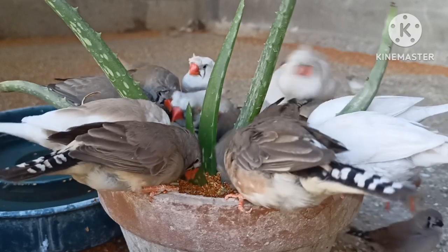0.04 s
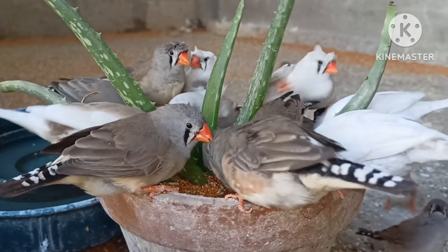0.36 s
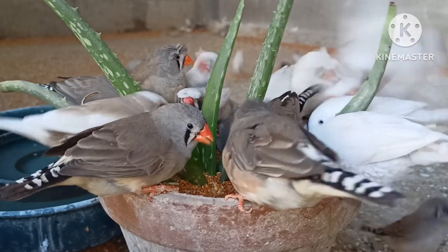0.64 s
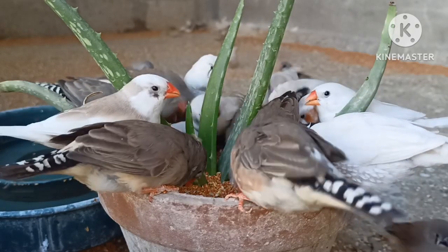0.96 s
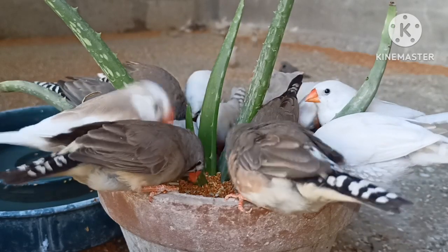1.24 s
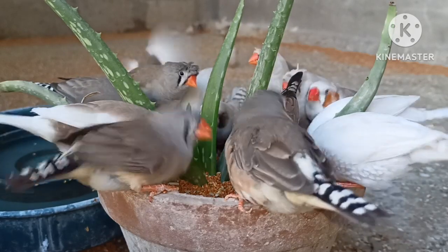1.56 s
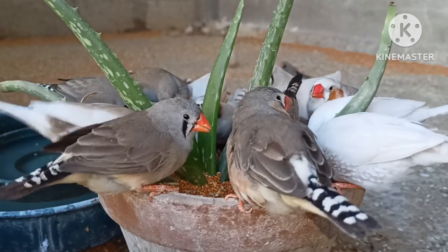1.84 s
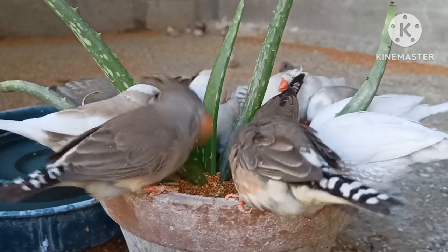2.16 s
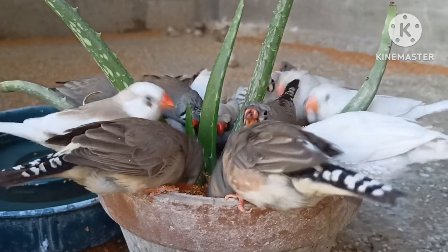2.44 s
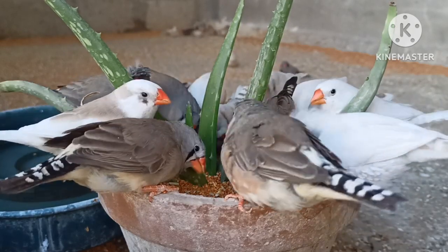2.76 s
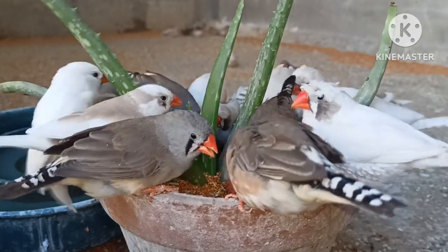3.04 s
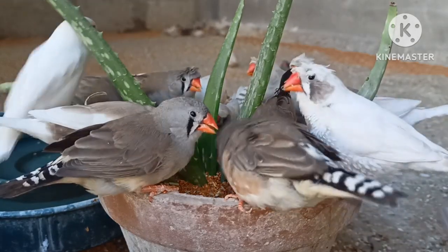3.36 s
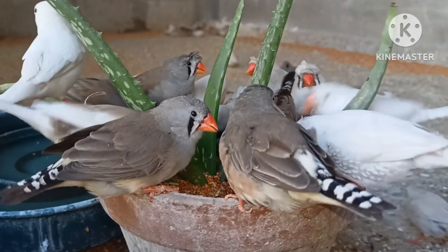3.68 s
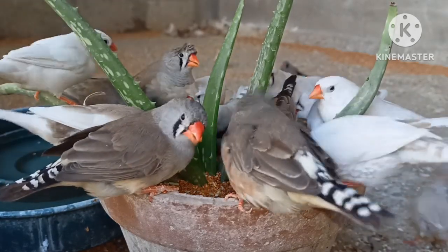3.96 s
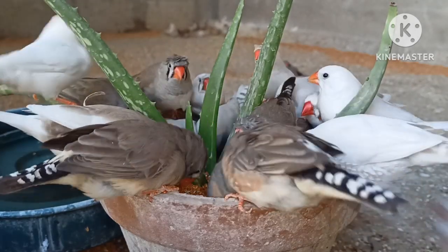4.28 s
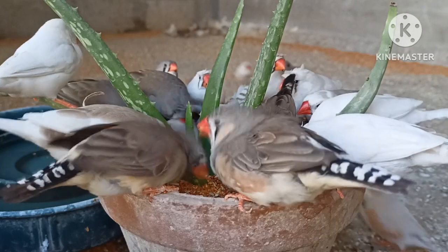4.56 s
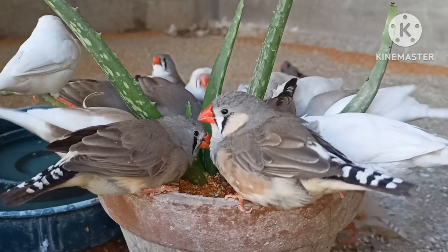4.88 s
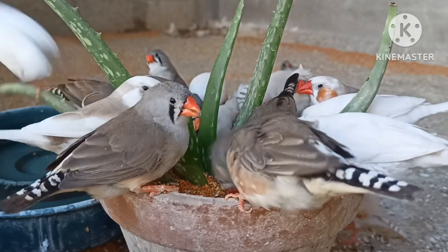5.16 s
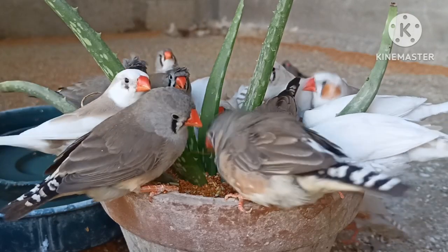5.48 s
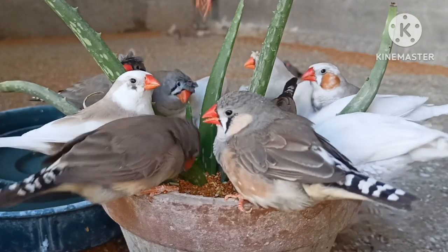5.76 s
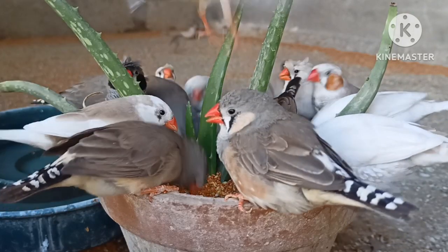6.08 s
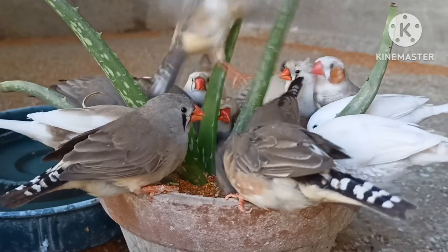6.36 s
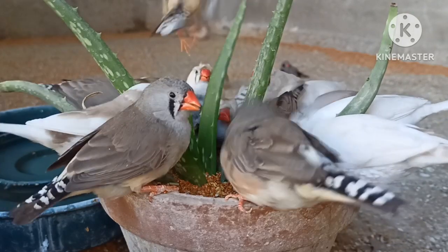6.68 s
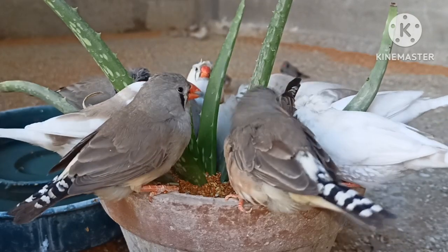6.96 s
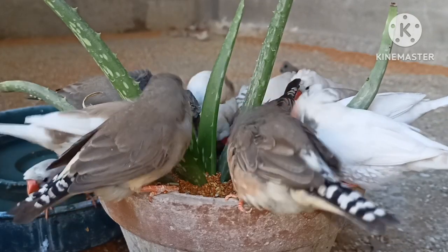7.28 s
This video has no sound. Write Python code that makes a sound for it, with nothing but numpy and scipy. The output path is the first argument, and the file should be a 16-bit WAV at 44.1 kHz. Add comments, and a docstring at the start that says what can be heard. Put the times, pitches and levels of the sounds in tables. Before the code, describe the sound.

Several finch fledglings beg with hoarse, rising calls while adults chip, wings flutter twice and beaks tick on seed over a low rumble.

```python
"""A brief nasal note, then the rasping, rising calls of finch fledglings begging, several at once.
The flock crowds round a pot of seed in a hard-walled aviary. The young whine between bouts; adults put
in short chips, level nasal calls and one squeak. The calls follow the source-filter principle: the
syrinx supplies harmonics and breath noise, and the throat and beak shape them. Wings whirr as birds
come and go, beaks tick on husks, and a low rumble lies under it all."""
import sys
import numpy as np
from scipy import signal
from scipy.fft import rfft, irfft, next_fast_len
from scipy.io import wavfile

SR = 44100
rng = np.random.default_rng(int(sys.argv[2]) if len(sys.argv) > 2 else 0)


def wav_record(signal):
    """Record a signal, one row per channel, as 16-bit PCM in the file named by sys.argv[1]."""
    frames = np.transpose(np.atleast_2d(signal))
    bounded = np.clip(frames, -1, 1)
    # unit amplitude maps onto the largest positive 16-bit level
    quanta = np.round(bounded * 32767).astype(np.int16)
    wavfile.write(sys.argv[1], SR, quanta)


N = 322812
TIME = np.arange(N) / SR
CUTOFF_HZ = 15750

# Spectra of the noise sources. Each row: frequency in Hz, relative spectral density in dB.
RUMBLE_SPECTRUM = [(30, -58), (60, -13.5), (100, -3.5), (145, 1.5), (210, -6), (290, -4), (450, -13),
                   (800, -18), (1600, -24.5), (2400, -31.5), (4500, -29), (9000, -37), (15000, -34)]
DRAUGHT_SPECTRUM = [(20, -32.5), (55, 1), (90, 7.5), (160, -1.5), (400, -36), (1500, -76)]
TICK_SPECTRUM = [(500, -29), (2500, -4), (6000, -7), (10000, -9), (15000, -3.5)]
PUFF_SPECTRUM = [(30, -24), (90, -2.5), (280, 4.5), (600, -6.5), (1500, -21.5), (5000, -57)]
SWISH_SPECTRUM = [(300, -12), (1500, 4.5), (4500, 5.5), (8000, 10), (11000, -2), (15000, 13)]
# Partials of a faint hum. Each row: frequency in Hz, level in dB.
HUM_PARTIALS = [(143, -52.5), (286, -57)]
# Air stirred by wings, and one close gust. Each row: time in seconds, relative level in dB.
DRAUGHT_LEVELS = [(0.0, -45), (0.08, -44), (0.16, -64), (0.37, -49.5), (0.55, -48), (0.73, -45),
                  (0.98, -42.5), (1.14, -66), (1.22, -56), (1.34, -62.5), (1.61, -49), (1.77, -68.5),
                  (1.87, -68), (2.0, -70), (2.2, -49), (2.26, -56), (3.36, -57), (3.53, -42), (3.67, -61.5),
                  (3.91, -69.5), (4.01, -57), (4.24, -71), (4.47, -60), (4.5, -56), (4.54, -29),
                  (4.56, -51), (4.63, -48), (4.83, -35.5), (5.18, -52), (5.34, -54), (5.46, -40),
                  (5.53, -59), (6.08, -36.5), (6.16, -46), (6.36, -41.5), (6.42, -46), (6.67, -50),
                  (6.83, -42), (6.89, -40), (7.32, -60)]
GUST_LEVELS = [(4.505, -64), (4.53, -27.5), (4.55, -30), (4.575, -59), (4.6, -76)]
# Impacts of beaks and claws. Each row: start in seconds, relative level in dB.
BEAK_TICKS = [(0.6115, -39), (1.1204, -41.5), (1.6741, -44.5), (1.8831, -46), (2.0448, -44), (2.0921, -56),
              (2.1375, -42), (2.2413, -43.5), (2.2932, -40.5), (2.4428, -33.5), (3.4531, -37),
              (4.1295, -41), (5.3984, -23.5), (5.5902, -37), (5.9304, -35.5), (6.3006, -30),
              (6.4612, -38.5), (6.8428, -39), (6.9745, -40)]
# Downstrokes. Each row: time in seconds, relative levels of air puff and feather swish in dB.
DOWNSTROKES = [(0.664, -37, -39), (0.704, -34, -37), (0.742, -29, -36.5), (0.782, -34.5, -36.5),
               (0.835, -29.5, -37), (0.871, -35, -37), (0.909, -29, -39.5), (6.258, -31.5, -41),
               (6.294, -28.5, -47.5), (6.328, -39, -44), (6.364, -29.5, -43.5), (6.401, -39, -45.5),
               (6.473, -32.5, -43.5), (6.552, -36, -45.5), (6.584, -35.5, -44), (6.622, -43, -48),
               (6.655, -42, -47.5), (6.69, -39, -46), (6.725, -31, -50)]
# Course of the squeak. Each row: time in seconds, pitch in Hz, relative level in dB.
SQUEAK_CONTOUR = [(2.503, 3600, -56), (2.514, 4700, -24), (2.524, 5750, -30), (2.537, 5500, -24.5),
                  (2.553, 5850, -32), (2.566, 5400, -31), (2.58, 5200, -47)]

# Throat filters, one for each kind of voice. Each row: frequency in Hz, relative gain in dB.
CHIP_FILTER = [(450, -8), (950, 1), (1700, 3.5), (2500, 0.5), (3800, 11), (4700, 6.5), (5700, 5.5),
               (8000, 6.5), (9800, -5), (12000, -1), (15000, -3)]
NASAL_FILTER = [(600, -8), (1250, -5.5), (1850, -6.5), (2450, -0.5), (3050, 4), (3700, 0.5), (4400, 3),
                (5600, -4.5), (7000, -6.5), (9000, -13), (14000, -18)]
WHINE_FILTER = [(500, -8), (1100, -13), (1650, -2), (2200, -22), (3000, -6.5), (3700, 2), (5400, 0.5),
                (6300, -11), (7800, -7.5), (9500, -29), (14000, -20)]
HOARSE_FILTER = [(500, -20), (850, -13.5), (1100, -9.5), (1300, -9.5), (1680, -1), (2200, -11),
                 (3100, -3.5), (3900, 1), (5100, 4.5), (6300, -2.5), (7600, -1), (8800, -15.5),
                 (10600, -22), (13600, -12.5)]
DEEP_FILTER = [(500, -17), (930, -3), (1250, -12), (1550, -7), (2300, -14), (3100, -1.5), (4000, 4.5),
               (5000, 2.5), (6300, -6), (7600, -4.5), (8800, -20), (11000, -17), (14000, -21)]
# Level nasal calls. Each row: start and length in seconds, nominal pitch in Hz, level in dB,
# loudest point as a fraction of the length, mid-call beak resonance in Hz.
NASAL_CALLS = [(-.05, 0.0823, 622, -32, 1, 4100), (1.529, .14, 631, -37, 0.43, 3480),
               (7.196, 0.075, 600.6, -38, .3, 4540)]
# Falling or arched chips, and soft whines. Each row: start and length in seconds, first, middle and
# last pitch in Hz, level in dB, loudest point as a fraction, mid-call beak resonance in Hz.
CHIP_CALLS = [(2.454, 0.065, 535, 494.2, 426, -29, 0.75, 6900),
              (3.077, .085, 520, 439, 369, -35, 0.46, 3420),
              (3.777, 0.0346, 515, 569, 550, -29.5, 0.3, 5670),
              (4.483, .052, 521, 483, 436, -29, 0.78, 5800), (4.972, .072, 760, 868, 750, -32, 0.66, 2300),
              (5.362, 0.053, 575, 475, 425, -27, 0.44, 6350),
              (7.018, 0.06, 514, 483, 429, -30.5, 0.58, 5800)]
WHINE_CALLS = [(1.912, 0.15, 461, 536.5, 538, -40, 0.42, 3800),
               (2.024, 0.083, 551, 599.7, 615, -40, 0.84, 3950),
               (2.157, .16, 471.4, 542.6, 549, -38.5, 0.39, 5000),
               (6.472, 0.136, 580, 593.3, 600, -57, .4, 3820),
               (6.785, .16, 450, 528.4, 504, -37, 0.33, 4960)]
# Begging calls. Each row: start and length in seconds, nominal first and last pitch in Hz,
# level in dB, loudest point as a fraction, mid-call beak resonance in Hz.
BEGGING_CALLS = [(0.094, 0.15, 461.7, 511.5, -29.5, 0.85, 6400), (0.113, 0.16, 743, 762, -29.5, 0.46, 6400),
                 (0.257, 0.12, 575, 675, -29, 0.7, 5040), (0.309, 0.19, 458.4, 495, -29.5, 0.5, 6300),
                 (0.451, 0.12, 637, 675, -30, 0.55, 6400), (0.605, 0.14, 648, 687, -36, 0.67, 7100),
                 (0.611, 0.17, 732, 771, -33, 0.4, 6300), (0.761, 0.28, 712.4, 784.5, -31, 0.41, 7000),
                 (0.838, 0.18, 458, 509, -33, 0.1, 3920), (0.9, 0.19, 629, 676, -32, 0.97, 7900),
                 (1.014, 0.18, 475.5, 516.1, -29, 0.65, 6660), (1.018, 0.24, 716.5, 801, -35, 0, 4000),
                 (1.15, 0.154, 599, 706, -32.5, 0.4, 6690), (1.23, 0.17, 460, 476, -30.5, 0.46, 7100),
                 (1.255, 0.21, 680, 766, -34.5, 0.83, 7600), (1.434, 0.1617, 696, 744, -32.5, 0.56, 6900),
                 (1.468, 0.13, 461.4, 479.6, -32, 0.72, 4880), (2.392, 0.1, 454, 566, -36.5, 0.67, 5730),
                 (2.612, 0.178, 644, 745, -33, 0.64, 5700), (2.642, 0.155, 537, 590, -35, 0.66, 7400),
                 (2.793, 0.16, 588, 684, -32.5, 0.58, 6790), (2.811, 0.15, 697, 805, -31, 0.39, 6700),
                 (2.925, 0.17, 563, 662.7, -31, 1, 7350), (2.99, 0.093, 704, 756, -34, 0.9, 6800),
                 (3.107, 0.149, 694, 772, -31, 1, 6900), (3.181, 0.2, 566, 649, -30.5, 0.57, 7000),
                 (3.238, 0.2, 703, 785, -32.5, 0.85, 6800), (3.442, 0.18, 552, 644, -30, 0.72, 6790),
                 (3.461, 0.18, 664, 769.4, -32, 0.57, 6500), (3.578, 0.28, 547, 687, -31, 0.61, 6900),
                 (3.627, 0.2, 697, 820, -31, 0.31, 4890), (3.847, 0.21, 557.4, 653, -28, 0.72, 6910),
                 (3.868, 0.21, 710, 800, -32.5, 0.3, 5350), (4.074, 0.21, 559, 626, -28.5, 0.4, 6900),
                 (4.077, 0.2, 692, 798, -28.5, 0.35, 5760), (4.287, 0.204, 550, 692.6, -27.5, 0.69, 6930),
                 (4.285, 0.23, 700, 796, -30, 0.26, 5500), (4.521, 0.2, 565.4, 664.2, -29.5, 0.7, 7040),
                 (4.501, 0.21, 690, 769, -30.5, 0.3, 5800), (4.747, 0.28, 550, 667, -29.5, 0.7, 7110),
                 (4.753, 0.21, 711, 771.2, -30, 0.39, 5900), (4.976, 0.24, 552, 608, -32, 0.59, 5800),
                 (4.995, 0.25, 700, 738, -33.5, 0.3, 7330), (5.127, 0.15, 538, 580, -29.5, 0.5, 5950),
                 (5.133, 0.1517, 707, 798, -30, 0.7, 6880), (5.319, 0.22, 572.5, 688.5, -28, 0.23, 6300),
                 (5.417, 0.18, 668, 735, -30.5, 0.54, 6700), (5.638, 0.15, 537.6, 578, -32, 0.29, 7030),
                 (5.65, 0.25, 650, 773, -30.5, 0.35, 5600), (5.811, 0.1633, 549, 607, -29, 0.6, 6550),
                 (5.796, 0.17, 739, 810, -30.5, 0.33, 6390), (5.972, 0.14, 543, 583, -28.5, 0.36, 6300),
                 (5.991, 0.27, 676, 785, -31.5, 0.77, 8000)]


def from_db(db):
    """Amplitude grows tenfold for every 20 dB."""
    return 10 ** (np.asarray(db) / 20)


def unit_power(x):
    """Division by the RMS value gives a signal unit power."""
    return x / np.sqrt(np.mean(x ** 2) + 1e-20)


def level_at(spectrum, hz):
    """A spectrum's level in dB, interpolated on a logarithmic frequency axis."""
    known_hz, db = np.transpose(spectrum)
    return np.interp(np.log(hz), np.log(known_hz), db)


def contours(rows):
    """Linear interpolation in time gives each column a value at every sample."""
    times, *columns = np.transpose(rows)
    return [np.interp(TIME, times, column) for column in columns]


def noise(spectrum, size):
    """Spectral shaping turns white noise into coloured noise of unit power."""
    padded = next_fast_len(size)
    hz = np.fft.rfftfreq(padded, 1 / SR) + 1
    shaped = rfft(rng.standard_normal(padded)) * from_db(level_at(spectrum, hz))
    return unit_power(irfft(shaped, padded)[:size])


def waver(rate_hz, size):
    """Low-pass filtered noise gives a smooth random fluctuation of unit power."""
    pole, settling = np.exp(-2 * np.pi * rate_hz / SR), 2000
    smooth = signal.lfilter([1], [1, -2 * pole, pole * pole], rng.standard_normal(size + settling))
    return unit_power(smooth[settling:])


def add(track, start, sound):
    """Superposition: a sound adds to the track from its start in seconds."""
    at = round(start * SR)
    sound, at = sound[max(-at, 0):], max(at, 0)
    track[at:at + len(sound)] += sound[:max(N - at, 0)]


def burst(spectrum, rise_s):
    """A noise transient peaks after its rise time, then decays exponentially."""
    age = np.arange(SR // 10) / SR / rise_s
    return noise(spectrum, len(age)) * age * np.exp(1 - age)


def background(rumble_db=-43.5, draught_gain_db=-1):
    """Outdoor rumble and a frequency-modulated hum, with the low pressure noise of moving air."""
    hum = np.zeros(N)
    for hz, db in HUM_PARTIALS:
        phase = 2 * np.pi * np.cumsum(hz + 7 * waver(14.8, N)) / SR
        hum += from_db(db) * np.sqrt(2) * np.sin(phase)
    draught = from_db(contours(DRAUGHT_LEVELS)[0] + draught_gain_db)
    gust = from_db(contours(GUST_LEVELS)[0])
    rumble = from_db(rumble_db) * noise(RUMBLE_SPECTRUM, N)
    return rumble + hum + (draught + gust) * noise(DRAUGHT_SPECTRUM, N)


def aviary(direct, t60_s=0.19, first_echo_s=0.0024, wall_hz=8000):
    """Reverberation: dense reflections from floor and walls lose some treble and decay exponentially."""
    age = np.arange(SR // 2) / SR
    echoes = rng.standard_normal(len(age)) * from_db(-60 * age / t60_s) * (age > first_echo_s)
    absorption = signal.butter(1, wall_hz, fs=SR, output="sos")
    response = signal.sosfilt(absorption, echoes / np.linalg.norm(echoes))
    return signal.fftconvolve(direct, response)[:N]


def pecking(tick_gain_db=2, husk_db=-53, husk_spread_db=5, husk_count=130):
    """Brief impacts have broad spectra: sharp beak ticks among many small cracks of seed husks."""
    out = np.zeros(N)
    for start, db in BEAK_TICKS:
        add(out, start, from_db(db + tick_gain_db) * burst(TICK_SPECTRUM, rise_s=0.00049))
    for start in rng.uniform(0, N / SR, husk_count):
        db = husk_db + husk_spread_db * rng.normal()
        add(out, start, from_db(db) * burst(TICK_SPECTRUM, rise_s=0.001))
    return out


def wings(puff_gain_db=-5, swish_gain_db=2, lead_s=0.0025):
    """Each downstroke displaces air in a low puff, while feather friction adds a bright swish."""
    out = np.zeros(N)
    for time, puff_db, swish_db in DOWNSTROKES:
        puff = from_db(puff_db + puff_gain_db) * burst(PUFF_SPECTRUM, rise_s=0.00443)
        swish = from_db(swish_db + swish_gain_db) * burst(SWISH_SPECTRUM, rise_s=0.0057)
        add(out, time - lead_s, puff + swish)
    return out


def squeak(octave_db=-13, gain_db=-1.5, jitter=.06):
    """Random frequency modulation roughens a shrill whistle and its octave."""
    pitch, db = contours(SQUEAK_CONTOUR)
    phase = 2 * np.pi * np.cumsum(pitch * (1 + jitter * waver(450, N))) / SR
    sounding = (TIME > SQUEAK_CONTOUR[0][0]) & (TIME < SQUEAK_CONTOUR[-1][0])
    whistle = np.sin(phase) + from_db(octave_db) * np.sin(2 * phase)
    return sounding * from_db(db + gain_db) * np.sqrt(2) * whistle


def call(length, pitches, crest, beak_hz, throat, jitter, rasp_db,
         beak_db, beak_fall_octaves, scatter_rad, fullness, beak_width_octaves=0.39):
    """Source and filter: the syrinx's harmonics and pulsed air noise pass the throat and closing beak."""
    size = int(length * SR)
    along = np.linspace(0, 1, size)
    swell_angle = np.pi * np.interp(along, [0, np.clip(crest, .1, .9), 1], [0, .5, 1])
    envelope = np.abs(np.sin(swell_angle)) ** (1 / fullness)
    glide = np.polyfit(np.linspace(0, 1, len(pitches)), pitches, len(pitches) - 1)
    pitch = np.polyval(glide, along)
    # Fast jitter leaves low harmonics clear and smears high ones; a slower quaver bends them all.
    unsteady = jitter * (waver(220, size) + .35 * waver(30, size))
    phase = 2 * np.pi * np.cumsum(pitch * (1 + unsteady - unsteady.mean())) / SR
    orders = np.arange(1, int(CUTOFF_HZ / np.mean(pitches)) + 1)[:, None]
    hz = orders * pitch
    # The beak's resonance sinks as it closes.
    resonance_hz = beak_hz * 2 ** (-beak_fall_octaves * (along - .5))
    resonance_db = beak_db * np.exp(-(np.log2(hz / resonance_hz) / beak_width_octaves) ** 2)
    gains = from_db(level_at(throat, hz) + resonance_db + rng.normal(0, 1, orders.shape))
    gains /= np.sqrt(np.sum(gains ** 2, axis=0) / 2)
    phase_offsets = scatter_rad * rng.standard_normal(orders.shape)
    voice = np.sum(gains * np.cos(orders * phase + phase_offsets), axis=0)
    # Air escapes in step with the pulses and is brighter than the voice.
    air_gains = gains * np.sqrt(np.minimum(hz / resonance_hz, 1))
    air_spectrum = np.column_stack([hz.mean(axis=1), 20 * np.log10(air_gains.mean(axis=1))])
    air = unit_power(noise(air_spectrum, size) * (1 + .7 * np.cos(phase)))
    return envelope * unit_power(voice + from_db(rasp_db) * air)


def adults(nasal_bend=(.97, 1.008, 1.003, .988, .93), jitter=.006, rasp_db=-16):
    """A resonance sweeps down as the beak snaps shut on a chip; nasal calls hold pitch, then droop."""
    out = np.zeros(N)
    for start, length, *pitches, db, crest, beak_hz in CHIP_CALLS:
        chip = call(length, pitches, crest, beak_hz, CHIP_FILTER, jitter, rasp_db,
                    beak_db=8, beak_fall_octaves=1.4, scatter_rad=0.91, fullness=1.0)
        add(out, start, from_db(db) * chip)
    for start, length, pitch, db, crest, beak_hz in NASAL_CALLS:
        nasal = call(length, pitch * np.array(nasal_bend), crest, beak_hz, NASAL_FILTER, jitter, rasp_db,
                     beak_db=5.5, beak_fall_octaves=0.14, scatter_rad=0.74, fullness=4.2)
        add(out, start, from_db(db) * nasal)
    return out


def whines():
    """Nearly periodic vibration gives soft, clearer calls between the bouts of begging."""
    out = np.zeros(N)
    for start, length, *pitches, db, crest, beak_hz in WHINE_CALLS:
        whine = call(length, pitches, crest, beak_hz, WHINE_FILTER, jitter=.009, rasp_db=-12,
                     beak_db=8.5, beak_fall_octaves=0.55, scatter_rad=0.41, fullness=1.71)
        add(out, start, from_db(db) * whine)
    return out


def fledglings(scoop=.975, arch=.016, shudder_db=1.5):
    """Jitter, shimmer and breath noise make the rising calls hoarse; one bird is deeper and clearer."""
    out = np.zeros(N)
    for start, length, first_hz, last_hz, db, crest, beak_hz in BEGGING_CALLS:
        deep = first_hz < 500
        throat, jitter, rasp_db = (DEEP_FILTER, .016, -7) if deep else (HOARSE_FILTER, .024, -4.5)
        # The pitch scoops up, climbs and levels off.
        pitches = np.linspace(first_hz, last_hz, 4) * [scoop, 1 + arch / 2, 1 + arch, 1]
        cry = call(length, pitches, crest, beak_hz, throat, jitter, rasp_db,
                   beak_db=10, beak_fall_octaves=.4, scatter_rad=1.33, fullness=1.31)
        add(out, start, from_db(db + shudder_db * waver(99, len(cry))) * cry)
    return out


def scene(reverb_gain_db=-2):
    """The birds' direct sound, its reflections and the background superpose at one listening point."""
    birds = fledglings() + whines() + adults() + squeak() + wings() + pecking()
    mono = birds + from_db(reverb_gain_db) * aviary(birds) + background()
    return np.array([mono, mono])


def record(dry):
    """An elliptic low-pass filter cuts the highest treble steeply."""
    return signal.sosfilt(signal.ellip(12, .1, 80, CUTOFF_HZ, fs=SR, output="sos"), dry)


dry = scene()
out = record(dry)
wav_record(out)
```